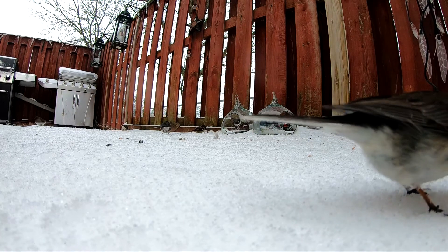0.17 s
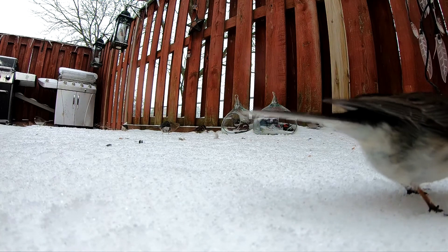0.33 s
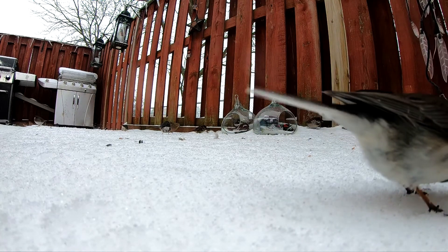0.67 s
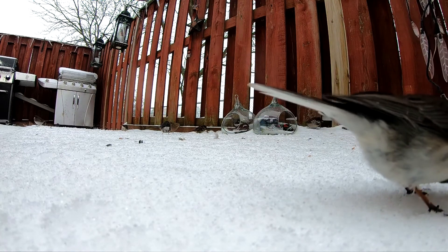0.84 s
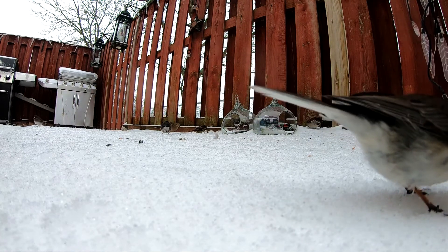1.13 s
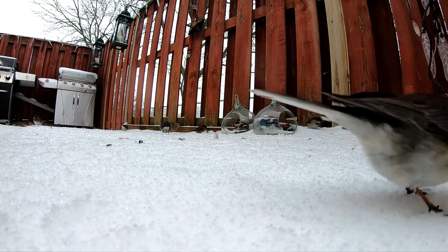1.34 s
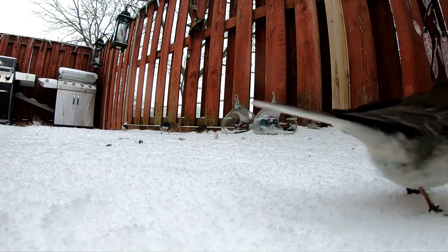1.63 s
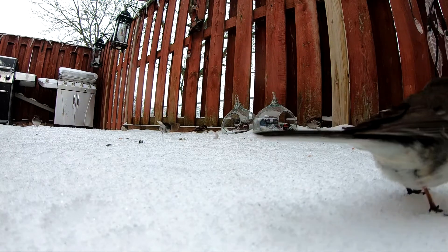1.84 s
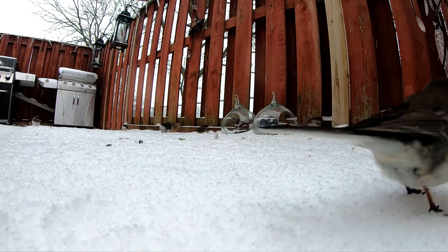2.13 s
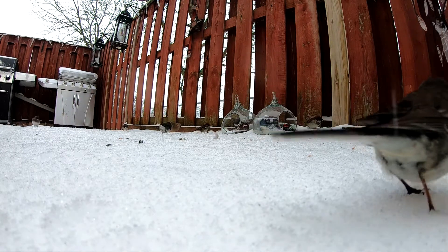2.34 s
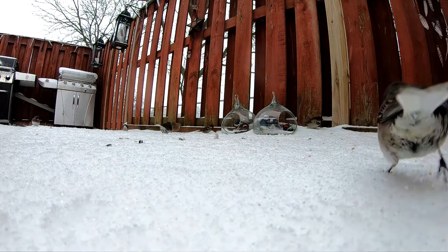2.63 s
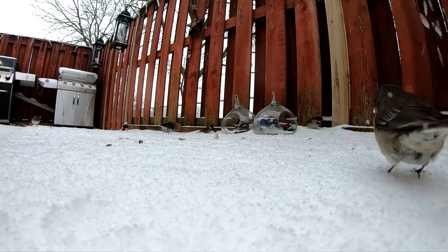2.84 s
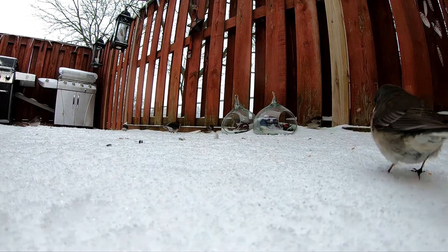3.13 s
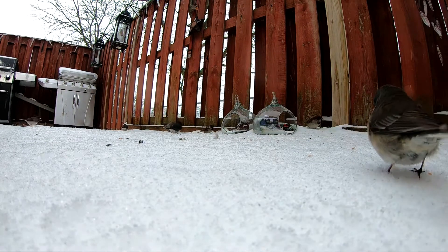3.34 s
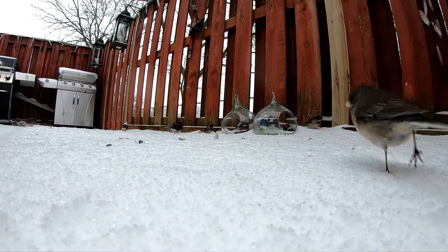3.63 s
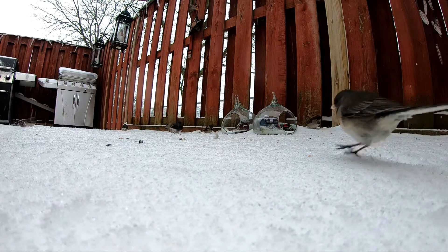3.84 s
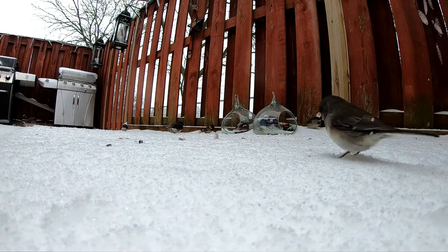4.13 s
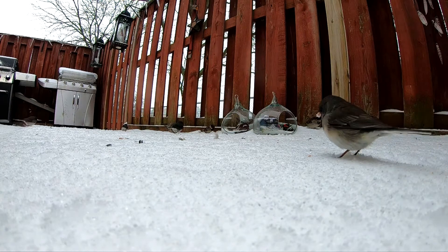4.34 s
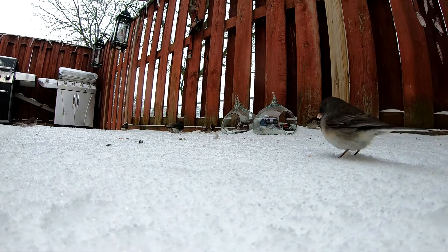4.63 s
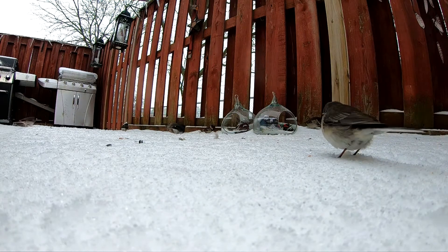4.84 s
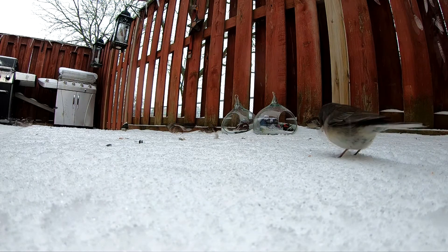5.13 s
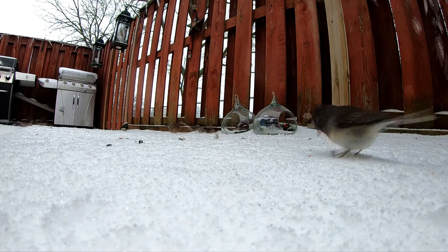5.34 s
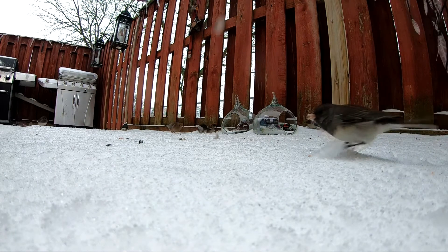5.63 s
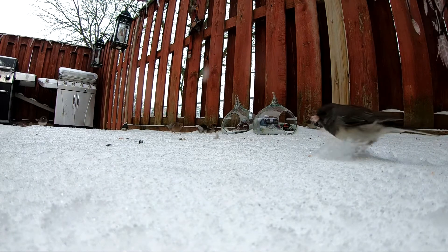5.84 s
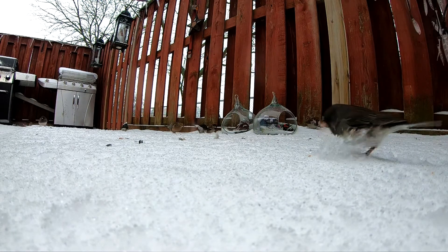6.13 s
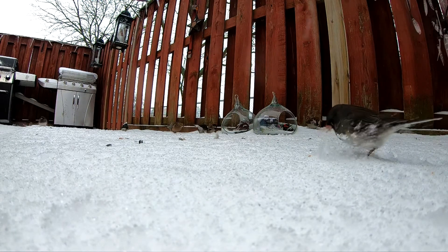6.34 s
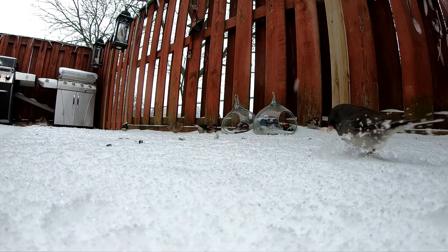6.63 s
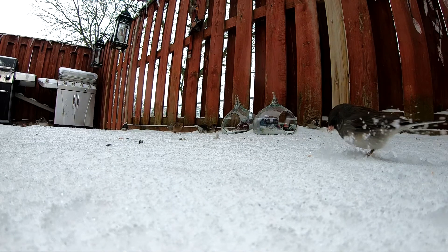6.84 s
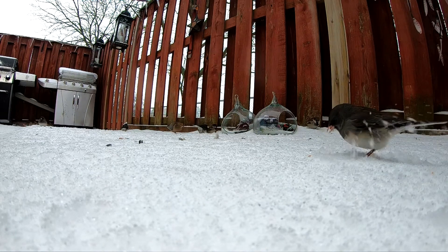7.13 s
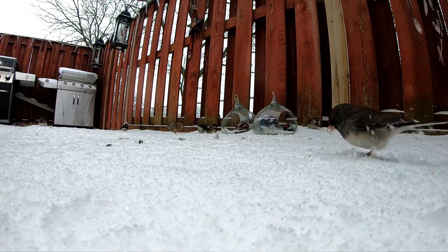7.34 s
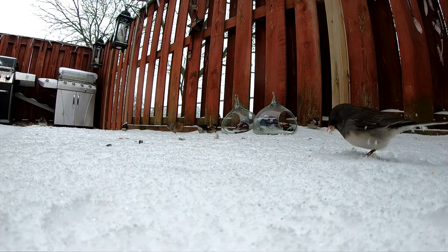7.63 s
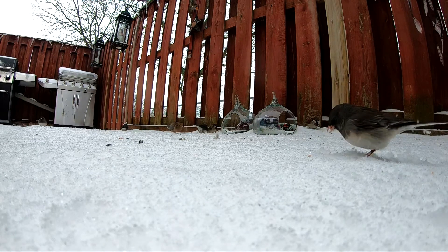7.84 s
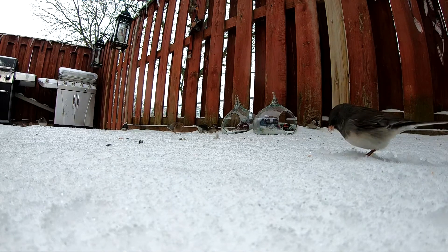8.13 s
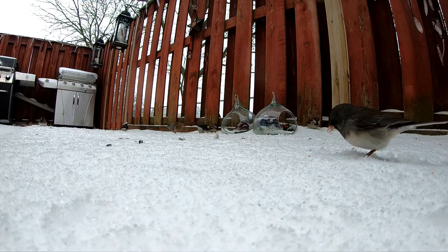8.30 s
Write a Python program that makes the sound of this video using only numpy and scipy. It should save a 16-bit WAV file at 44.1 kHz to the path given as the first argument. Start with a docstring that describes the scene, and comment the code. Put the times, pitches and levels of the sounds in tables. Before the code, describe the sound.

Outdoors in a snowy yard, ice pellets and crumbs of crust hit a small microphone case lying on the snow. Dry, crisp clicks come very close, mostly left, over a fine grainy patter in uneven bunches. Dull, short thuds from heavier hits and a small bird's hops punctuate it, strongest midway and near seven seconds. Low gusty wind rumbles mainly on the right over a faint hush.

```python
"""Ice pellets and crumbs of frozen crust strike a small camera lying on the snow in a yard, mostly by its left port.
Each hit is a short crumbling noise that rings modes of the case; heavier hits and a small bird's hops
thud as swings that sag in pitch. One shower curve drives light pellets, fine grains and soft crust bumps.
Behind them lie a faint outdoor hush and gusts that rumble mainly on the right port, all of coloured noise."""
import sys
import numpy as np
from scipy import signal
from scipy.fft import rfft, irfft, next_fast_len
from scipy.io import wavfile
from scipy.ndimage import uniform_filter1d

SR = 44100
rng = np.random.default_rng(int(sys.argv[2]) if len(sys.argv) > 2 else 0)


def dump_mix(stems):
    """Bounce the given channels to the path in sys.argv[1] as a 16-bit WAV at rate SR."""
    frames = np.atleast_2d(stems).T  # one column per channel
    limited = np.clip(frames, -1, 1)  # hard clip at full scale
    pcm = np.round(limited * 32767).astype(np.int16)
    wavfile.write(sys.argv[1], SR, pcm)


N = 373527
TIME = np.arange(N) / SR  # seconds
LEAD_S = .006  # time in a crack before its main blow
TOP_HZ = 16300  # upper limit of the microphones

# Strength of the shower, which each layer scales by its own swell: start_s [s], shower_db [relative dB]
SHOWER = [(0.0, -56.5), (0.7, -60.5), (1.3, -63), (1.62, -55), (1.86, -60), (2.45, -56), (2.9, -56),
          (3.3, -61.5), (3.7, -60.5), (4.2, -53), (4.7, -54), (5.3, -61), (6.0, -53.5), (6.4, -54.5),
          (6.65, -69.5), (7.1, -54), (7.45, -61.5), (7.7, -56), (8.47, -61.5)]


def undb(db):
    """Decibels to gain."""
    return 10 ** (np.asarray(db) / 20)


def unit(x):
    """Scale to rms 1."""
    return x / np.sqrt(np.mean(x ** 2) + 1e-20)


def ports(pan_db):
    """Left and right gains of constant total power; pan_db is left minus right."""
    pair = undb(np.array([pan_db, -pan_db]) / 2).reshape(2, -1)
    return pair / np.sqrt(np.sum(pair ** 2, axis=0))


def contour(points, hz):
    """Spectrum in dB, joined on a log-frequency axis."""
    point_hz, point_db = np.transpose(points)
    return np.interp(np.log(hz + 1), np.log(point_hz), point_db)


def colour(x, points):
    """Filter a long signal by a gain contour, then scale to rms 1."""
    size = next_fast_len(N)
    gain = undb(contour(points, np.fft.rfftfreq(size, 1 / SR)))
    return unit(irfft(rfft(x, size) * gain, size)[..., :N])


def ring(push, db):
    """Response of a body with this gain curve to a push; minimum phase, so it never rings ahead."""
    cepstrum = irfft(db * np.log(10) / 20)
    half = len(cepstrum) // 2
    # folding the cepstrum onto positive time makes the response causal
    cepstrum[1:half] *= 2
    cepstrum[half + 1:] = 0
    return irfft(rfft(push) * np.exp(rfft(cepstrum)))


def bump(hz, centre, width):
    """Resonance shape, 1 at its centre."""
    return 1 / (1 + (2 * (hz - centre) / width) ** 2)


def walk(rate):
    """Slow random curve of rms 1 with about `rate` new values a second, joined by ramps."""
    hold = int(SR / rate)
    steps = np.repeat(rng.standard_normal(N // hold + 1), hold)
    return unit(uniform_filter1d(steps, hold)[:N])


def shower_at(s):
    """Relative strength of the shower in dB at time s."""
    return np.interp(s, *np.transpose(SHOWER))


def add(out, s, sound):
    """Mix a stereo sound in at time s."""
    i = int(np.clip(s * SR, 0, N - 1))
    out[:, i:i + sound.shape[1]] += sound[:, :N - i]


def hush(level_db=-50, shared_gain=-0.3276, pan_db=1):
    """Nearly steady distant outdoor noise; its bass is partly alike at both ports."""
    # filter on the air at the ports: centre_hz [Hz], gain_db [relative dB]
    hush_colour = [(100, -5), (160, -14), (270, -20.5), (420, -16), (680, -10.5), (1300, -17),
                   (2700, -20.5), (5200, -32), (8000, -31), (16000, -40)]
    common = colour(rng.standard_normal(N), [(100, -8.0), (300, -3.5), (800, -27), (4000, -94)])
    air = rng.standard_normal((2, N)) + shared_gain * common
    drift = undb(.35 * walk(3))
    return colour(air, hush_colour) * ports(pan_db) * undb(level_db) * drift


def wind(lee_db=-40, lee_share=0.24, usual_db=-39, eddy_db=3.5, eddies_per_s=9, flutter_db=2.33):
    """Gusts blow on the right port and reach the sheltered left one in part; eddies buffet each port on its own."""
    # gusts at the right port ahead of eddies and flutter: start_s [s], level_db [dB]
    gust_points = [(0.0, -34.5), (0.22, -33.5), (0.45, -43), (0.85, -41.5), (1.15, -37), (1.6, -32),
                   (2.9, -37), (3.25, -43), (3.5, -36), (3.95, -36), (4.25, -27.5), (4.85, -33), (5.1, -40),
                   (5.8, -43), (6.7, -43.5), (7.05, -38.5), (7.7, -47.5), (8.47, -39.5)]
    # rumble of the wind: centre_hz [Hz], gain_db [relative dB]
    wind_colour = [(12, -20), (24, 7.5), (38, -0.5), (60, 3.5), (95, -10), (125, -13.5), (170, -27),
                   (350, -35), (900, -48), (3000, -97)]
    gust = np.interp(TIME, *np.transpose(gust_points))
    lee = lee_db + lee_share * (gust - usual_db)
    db = np.array([side + eddy_db * walk(eddies_per_s) for side in (lee, gust)])
    flutter = flutter_db * walk(38)  # alike at both ports
    return colour(rng.standard_normal((2, N)), wind_colour) * undb(db + flutter)


def patter(level_db=-61, per_s=95, spread_db=4.0, grain_s=0.0015, pan_db=6, swell=1.37,
           usual_db=-60, ring_db=8, bunch_db=6.5, count=6):
    """Small grains land and bounce in bunches; they fall into a few groups, each ringing at its own pitch, and
    each grain is heard by one port."""
    # filter on the ringing grains: centre_hz [Hz], gain_db [relative dB]
    grain_colour = [(300, -60), (1200, 12), (2700, 1.5), (4000, 1.5), (6200, 4), (9000, -2), (12000, -1),
                    (14500, 1.5), (16000, -24)]
    bunches = undb(bunch_db * walk(45))
    rate = per_s * bunches / bunches.mean()  # landings a second at each port, all sizes together
    grains = 0
    for ring_hz in np.geomspace(3000, 14000, count):
        lands = rng.random((2, N)) < rate / count / SR
        sizes = undb(spread_db * np.minimum(rng.exponential(size=(2, N)), 4.5))
        fade = np.exp(-2 / (grain_s * SR))
        power = signal.lfilter([1], [1, -fade], lands * sizes ** 2 + 1e-18)
        clicks = uniform_filter1d(np.sqrt(power), size=26) * rng.standard_normal((2, N))
        rung = signal.lfilter(*signal.iirpeak(ring_hz, 5, fs=SR), clicks)
        grains = grains + clicks + undb(ring_db) * rung
    level = undb(level_db + swell * (shower_at(TIME) - usual_db))
    return colour(grains, grain_colour) * ports(pan_db) * level


def shuffle(level_db=-55, usual_db=-57, swell=1.84, pan_db=9, jolt_db=8.5, jolts_per_s=30):
    """Soft uneven bumping of the crust under the case, stronger when the shower thickens."""
    # dull noise of the crust: centre_hz [Hz], gain_db [relative dB]
    shuffle_colour = [(60, -10), (130, -4), (200, -6), (400, -12), (900, -26.5), (2500, -53)]
    jolts = unit(undb(jolt_db * np.clip(walk(jolts_per_s), -2, 2)))
    level = undb(level_db + swell * (shower_at(TIME) - usual_db))
    return colour(rng.standard_normal((2, N)), shuffle_colour) * ports(pan_db) * jolts * level


def crack(decay_ms, ring_hz, body_db, top_db, crumble_db=4, tail_db=-30, tail_s=0.013, ring_db=9.0, ring_q=7,
          stray_db=5, stray_width_hz=380, bass_db=-2, air_db=-4, graze_db=-14, graze_ms=0.88, size=4096):
    """One hit of energy 1: the crust grazes, then a dying run of tiny fractures rings modes set by where it lands."""
    # modes of the case: centre_hz [Hz], width_hz [Hz], lift_db [dB]
    case_modes = [(714, 87, 1.5), (3100, 1900, 3.5), (6460, 3100, 1.5), (10300, 390, 3), (11600, 430, 3.5),
                  (13200, 510, 1)]
    ms = 1000 * (np.arange(size) / SR - LEAD_S)
    hz = np.fft.rfftfreq(size, 1 / SR)

    fractures = rng.standard_normal(size) * undb(crumble_db * rng.standard_normal(size))
    clumps = undb(3 * np.repeat(rng.standard_normal(size), repeats=32)[:size])
    tail = undb(tail_db) * np.exp(-np.arange(size) / SR / tail_s)
    crush = np.exp(-abs(ms) / max(decay_ms, .2)) + tail
    # a soft crumb, with its longer decay, touches down more gradually than a hard pellet
    graze = undb(graze_db) * np.exp(-abs(ms) / (graze_ms * np.sqrt(abs(decay_ms) + 0.048)))
    push = fractures * clumps * uniform_filter1d(np.where(ms < 0, graze, crush), size=22)

    db = contour([(60, body_db + 7.5), (450, body_db + bass_db), (1400, body_db - 4), (2200, 0.018),
                  (6500, 0), (9000, top_db), (16000, top_db + air_db)], hz)
    db += sum(lift * bump(hz, centre, width) for centre, width, lift in case_modes)
    db += ring_db * bump(hz, ring_hz, ring_hz / ring_q)
    # the place of the blow favours some of the higher modes and misses others
    for place, strength in rng.random(size=(22, 2)):
        stray_hz = 2000 + place * (TOP_HZ - 2000)
        db += stray_db * (2 * strength - 1) * bump(hz, stray_hz, stray_width_hz)
    sound = ring(push, db - 40 * np.maximum(hz / TOP_HZ - 1, 0))
    return sound / np.sqrt(np.sum(sound ** 2))


def strike(db, pan_db, nominal_decay_ms, ring_hz, body_db, top_db, decay_scale=0.69, far_smear_ms=1.5):
    """The near port hears each hit sharply, the far one weaker and more smeared."""
    one_ms = np.sqrt(SR / 1000)  # gives a crack the energy of a 1 ms burst of rms 1
    pair = []
    for side in (1, -1):
        smear_ms = far_smear_ms * (side * pan_db < 0)
        pair.append(crack(decay_scale * nominal_decay_ms + smear_ms, ring_hz, body_db, top_db))
    return one_ms * undb(db) * ports(pan_db) * np.array(pair)


def pellets():
    """The hard hits on and beside the case that stand out of the shower."""
    # start_s [s], level_db [dB of a 1 ms burst of equal energy], left_minus_right_db [dB],
    # nominal_decay_ms [ms before strike() scales it], ring_hz [Hz, favoured ring], body_db [dB], top_db [dB]
    hits = [(0.0503, -30, 19, 1.3, 11800, 2, 0), (0.074, -17.5, 35, 8.6, 2220, 2, -5.5),
            (0.1241, -33.5, -26, 3.8, 9100, 1, -2), (0.2403, -34, 13, 4.2, 13700, 4, 12),
            (0.4318, -14, 34, 1.9, 6000, -6.5, -2), (0.4476, -27, 19, 1.8, 8240, -17, 4),
            (0.5228, -27.5, 2, 2.8, 2930, -1.5, 1.5), (0.5573, -31, 30, 14, 9700, 1.5, -1.5),
            (0.8953, -27.5, 0, 2.2, 2800, 10, -6), (1.0036, -16, 24, 3.3, 8800, -12.5, -2),
            (1.0957, -34.5, 10, 1.7, 4700, -20, -13), (1.4008, -29.5, 20, 4, 4110, 3, -1),
            (1.4398, -28, 22, 5, 6340, -6, 4), (1.4523, -23.5, 14, 8.4, 2590, 2.5, 1.5),
            (1.6218, -32, -19.5, 9.5, 5400, -8, 0), (1.6717, -18.5, 15, 5.9, 2800, -6, -1.5),
            (1.8713, -26.5, 6, 13, 12000, 4, -1), (1.9734, -23.5, -19, 9.7, 5200, -11, -3),
            (2.0159, -15.5, 38, 7.6, 9450, -0.5, 1), (2.0544, -28, 15, 1.3, 6400, -20, -2),
            (2.0683, -31.5, 16, 1.4, 5300, -22, -18), (2.0849, -23.9, 20, 3.8, 3300, -5.5, -6.5),
            (2.1823, -19.5, 35, 1.6, 4640, 6.5, -3), (2.3249, -18, 18, 3.8, 3160, 3.5, -1),
            (2.3697, -18, 23, 3.7, 3060, 11.5, -6), (2.3777, -26, 22, 0.86, 2360, -8, -1),
            (2.4, -26.5, 27, 6.1, 4100, -10, 2), (2.455, -32, 24, 3.2, 3300, -11, -2),
            (2.822, -20, 30, 1.03, 2570, 2, 1), (2.838, -26, 1, 7.6, 5600, 3, -9),
            (2.881, -33, 5, 0.99, 2540, -9, -6), (2.9294, -28.5, 23, 1.6, 4800, 3, -3),
            (2.9637, -28, 34, 0.53, 2370, 1, -16), (3.0983, -31, 6, 3, 5140, -2, 0),
            (3.107, -23, 30, 2.5, 5100, 3.5, -10), (3.158, -26.5, -25, 3.2, 8400, -6, 0.5),
            (3.1738, -30.5, 22, 1.9, 10600, -9, 1), (3.242, -29.5, 20, 3.1, 2600, 6, -5),
            (3.4345, -32, -25, 0.99, 4260, -8, -20), (3.5591, -6.5, 34, 10.5, 2660, 4.5, -2.5),
            (3.661, -32.5, 34, 0.36, 6350, -27, 2), (3.729, -27.5, 12, 4.9, 11600, 0, -4),
            (3.78, -30.5, 30, 0.85, 11900, -7, -1), (3.8693, -19, 30, 1.2, 10200, 1, 2),
            (4.041, -33.5, 21, 17, 2820, 6, 0), (4.0892, -25.5, 0.5, 6.2, 10800, 7, -0.5),
            (4.1322, -21, 28, 0.58, 12500, 9, 2.5), (4.2522, -16.5, 39.5, 2.1, 4970, 2.5, 1.5),
            (4.355, -26.5, 35, 0.25, 5250, -16, -5), (4.5259, -31.5, 16, 2.1, 5130, -25, -8),
            (4.566, -27.5, 30, 2.3, 11600, -13, 1.5), (4.629, -30, 5, 12, 12000, -18, 2),
            (4.6487, -25, 11, 53, 12800, 2, 0), (4.6836, -27.5, 26, 4, 7300, 5, 0),
            (4.76, -28, 13, 10, 8100, -25, 7), (4.7898, -32, 11, 8, 12400, 3.5, -2),
            (4.8055, -29.5, 24, 5.8, 5950, -20, 2), (4.92, -34, 24, 1.4, 4600, -14, 2),
            (4.9532, -24, 33, 0.69, 5400, -4.5, 11), (5.15, -32, 17, 18, 9700, 0, 3),
            (5.2552, -29, 16, 6.5, 6450, 1, -5), (5.276, -24, 12, 17, 2860, 10, -1),
            (5.3495, -33, 8, 3.2, 12300, 15, 5), (5.4216, -26, 20, 3.6, 1970, 16, -11),
            (5.4748, -11.5, 45, 4.5, 9600, 5, 0), (5.522, -23.5, 31, 9.1, 14000, 4.5, -2),
            (5.6022, -15, 34, 1.1, 2930, 7.5, -18), (5.661, -22, 10.5, 13, 5600, -3, -4),
            (5.7653, -27, 30, 1.1, 3140, 10.5, 4), (5.9037, -28, 34, 0.53, 11700, -12, 2),
            (5.9485, -14.5, 39.5, 6.1, 6130, 0.5, -1), (6.003, -30.5, 32, 7.8, 10000, 9.5, -4),
            (6.015, -18.5, 41, 0.79, 5900, -22, -6), (6.051, -25, 17, 2.2, 13710, 1, 1.5),
            (6.226, -14.5, 39, 1.8, 5200, -4, 2.5), (6.24, -31, 29, 6.7, 3220, -1, -11),
            (6.255, -24, 31, 2.5, 5960, 6, -2), (6.3214, -26.5, 31, 9.7, 3490, 10.5, 3),
            (6.444, -26, 30, 0.69, 11100, -2, 0.5), (6.871, -29.5, 4, 7.8, 4350, -2, -4),
            (7.027, -7, 42, 3.7, 2100, 5.5, -8), (7.0415, -18.5, 32, 7.1, 3120, 7, 5),
            (7.0578, -27.3, 26, 3.2, 3730, -8, 0), (7.072, -16, 26.5, 2.1, 8360, -11, -7.5),
            (7.3054, -25, 29, 2.1, 7400, -6, -4), (7.4206, -26, 26, 7.6, 4730, 3, -3),
            (7.5843, -25.5, 32, 3, 1990, 1, 1), (7.618, -32.5, 10, 2.9, 5600, 1, -6),
            (7.7603, -31, 6, 19, 3420, 8.5, -7), (8.0113, -30.5, 13, 14, 2420, 7, 1),
            (8.1666, -18, 36, 0.28, 8300, -4.5, -7.5), (8.2494, -19.5, 37, 0.69, 4300, -4, -15),
            (8.2611, -29.5, 33, 0.83, 5270, -1.5, 2)]
    out = np.zeros((2, N))
    for s, *hit in hits:
        add(out, s - LEAD_S, strike(*hit))
    return out


def small_pellets(per_s=13, usual_db=-57, crowd=1.3, level_db=-39, spread_db=2.5, pan_db=14, pan_spread_db=14,
                  nominal_decay_ms=1.5, decay_spread=0.68, body_db=-4, body_spread_db=8,
                  top_db=-1, top_spread_db=4, count=400):
    """Light pellets hit the case at random, more often when the shower thickens."""
    # where the favoured ring may lie: lowest_hz [Hz], highest_hz [Hz]
    ring_range_hz = (2346, 13700)
    out = np.zeros((2, N))
    chances = rng.random((count, 3))
    spreads = np.clip(rng.standard_normal((count, 5)), -2, 2)
    for (when, luck, place), z in zip(chances, spreads):
        s = when * N / SR
        rate = per_s * undb(crowd * (shower_at(s) - usual_db))
        # each candidate lands only if the shower is thick enough for its luck
        if luck < rate * N / SR / count:
            ring_hz = np.exp(np.interp(place, [0, 1], np.log(ring_range_hz)))
            hit = strike(level_db + spread_db * z[0], pan_db + pan_spread_db * z[1],
                         nominal_decay_ms * np.exp(decay_spread * z[2]), ring_hz,
                         body_db + body_spread_db * z[3], top_db + top_spread_db * z[4])
            add(out, s, hit)
    return out


def thuds(cycles=2.15, rise_s=0.0023, scuff_db=-10, sag=0.66, sag_s=0.0094, size=8192):
    """A soft blow through snow and case: a few swings that sag in pitch as the snow gives, with a dull scuff."""
    # start_s [s], level_db [dB], left_minus_right_db [dB], centre_hz [Hz, the pitch sags past it]
    knocks = [(0.087, -32.5, 13, 174), (0.156, -35.5, 20, 178), (0.195, -43, 15, 490),
              (0.203, -27, 13.5, 102), (0.435, -34.5, 25, 178), (0.876, -41, 24, 523),
              (1.009, -31.5, 23, 108), (1.462, -37, 18, 147), (1.564, -34.5, 24, 150),
              (1.674, -29, 28, 206), (2.017, -40.5, 26, 265), (2.18, -39, 14.5, 325), (2.27, -41, 14, 190),
              (2.336, -24.5, 25, 125), (3.1, -37, 28, 206), (3.562, -28.5, 30, 524),
              (3.565, -16, 32, 127.5), (3.57, -16.5, 27, 53.3), (4.251, -34.5, 21, 320),
              (4.329, -33.5, 3, 128), (4.631, -31.5, 11, 137), (4.768, -35.5, 17.5, 165),
              (5.29, -35, 35, 212), (5.423, -29.5, 32, 327), (5.476, -26.5, 33, 136), (5.598, -40, 16, 210),
              (6.224, -37.5, 24, 215), (6.227, -30.5, 28, 690), (6.279, -29, 16, 142),
              (6.319, -39, 19, 200), (6.393, -33.5, 25, 211), (6.767, -33.5, -19, 238),
              (6.871, -24.5, 27, 42.6), (7.024, -32, 30, 335), (7.061, -25.5, 37, 150),
              (7.768, -39, 19, 198), (8.018, -40.5, 25, 202)]
    out, t = np.zeros((2, N)), np.arange(size) / SR
    for s, db, pan_db, hz in knocks:
        phase = np.cumsum(hz * (0.595 + sag * np.exp(-t / sag_s))) / SR
        dull = signal.butter(2, [hz / 2, 2 * hz], "band", fs=SR, output="sos")
        scuff = unit(signal.sosfilt(dull, rng.standard_normal((2, size))))
        swing = np.sqrt(2) * np.sin(2 * np.pi * phase) + undb(scuff_db) * scuff
        fade = (1 - np.exp(-t / rise_s)) * np.exp(-t * hz / cycles)
        add(out, s - .002, undb(db) * ports(pan_db) * swing * fade / fade.max())
    return out


def scene():
    """Hits, knocks and patter at the camera, over wind and distant hush."""
    return pellets() + small_pellets() + thuds() + shuffle() + patter() + wind() + hush()


def record(dry):
    """The camera cuts the top with a steep low-pass filter."""
    return signal.sosfilt(signal.ellip(10, .2, 70, TOP_HZ, fs=SR, output="sos"), dry)


dry = scene()
out = record(dry)
dump_mix(out)
```